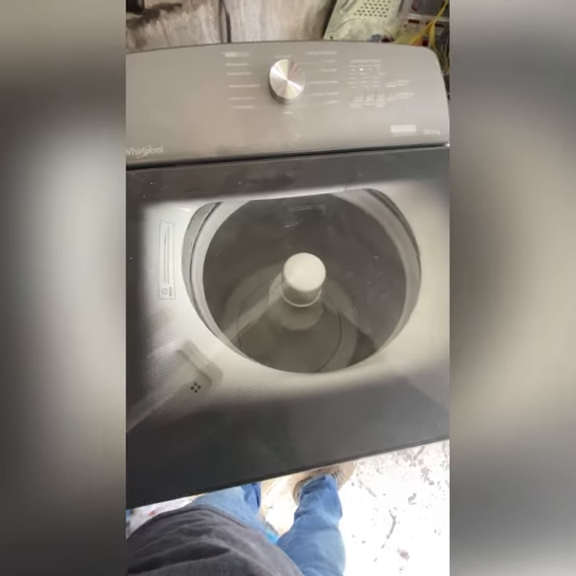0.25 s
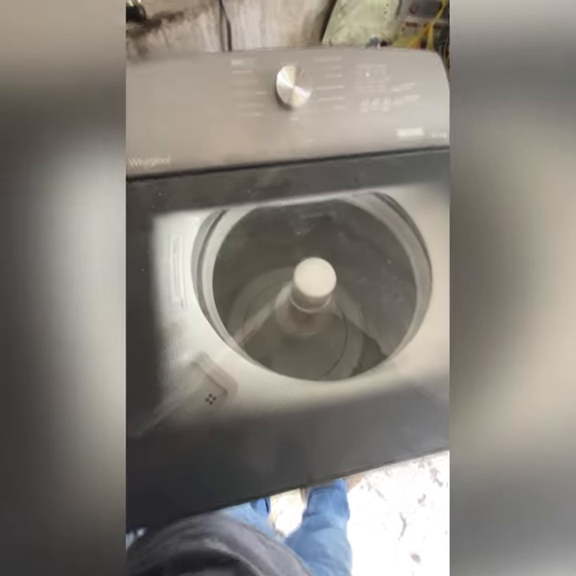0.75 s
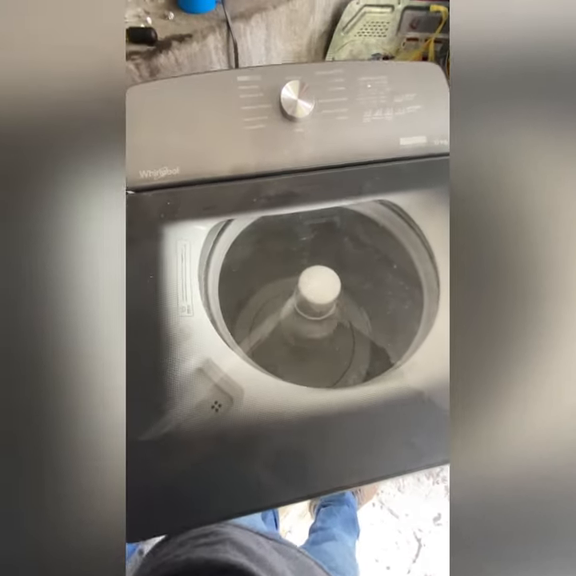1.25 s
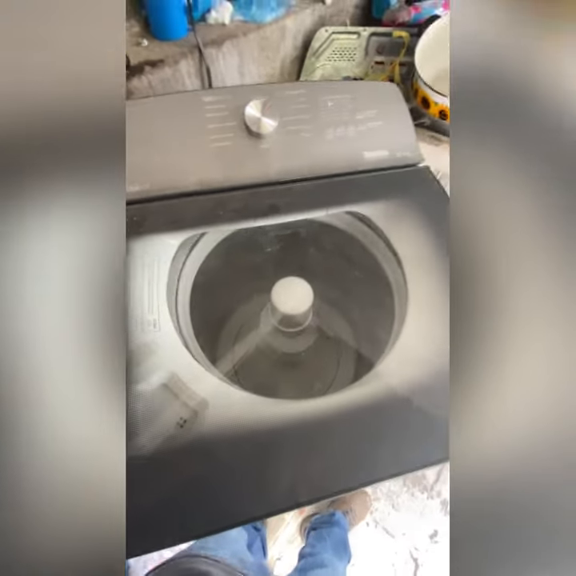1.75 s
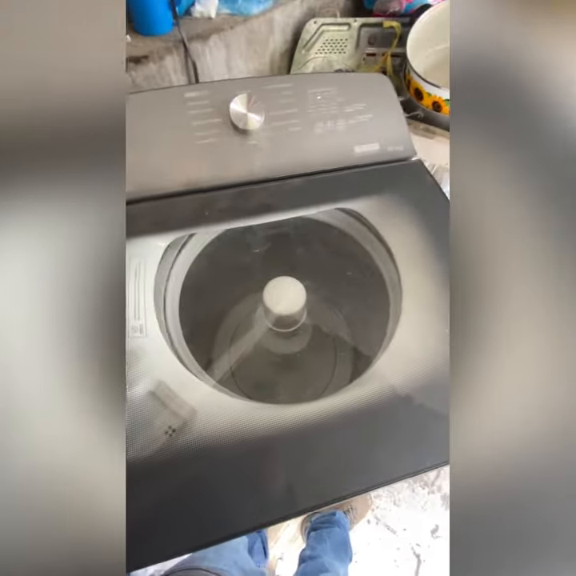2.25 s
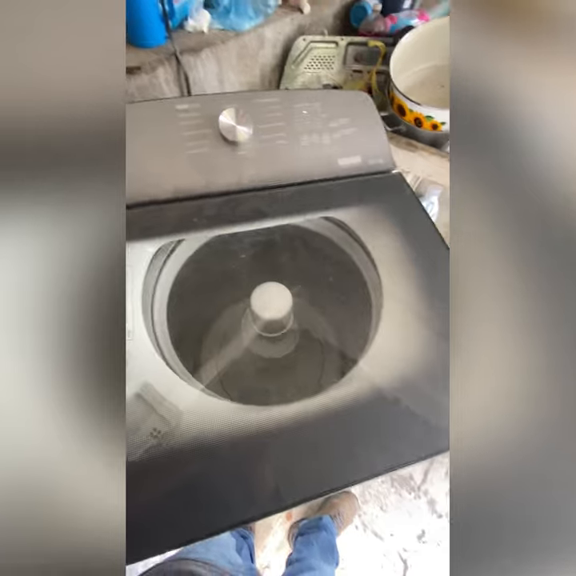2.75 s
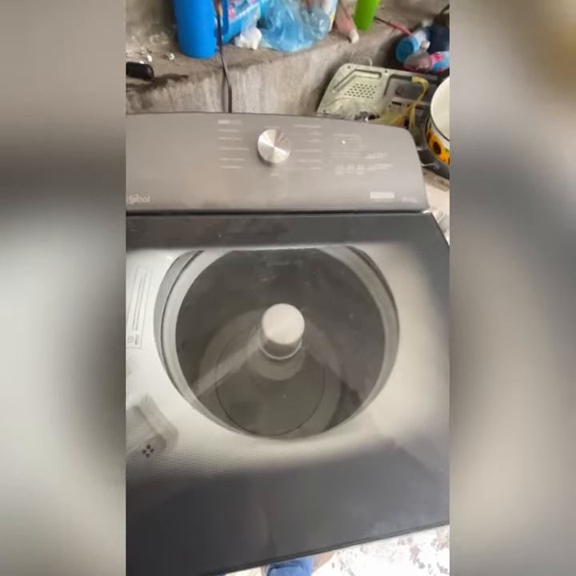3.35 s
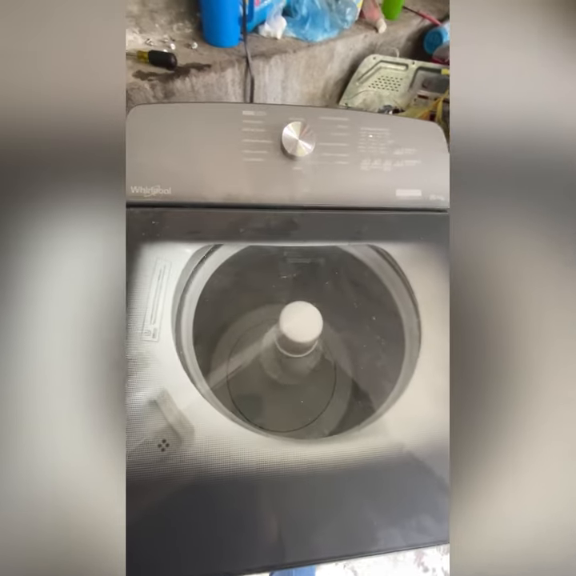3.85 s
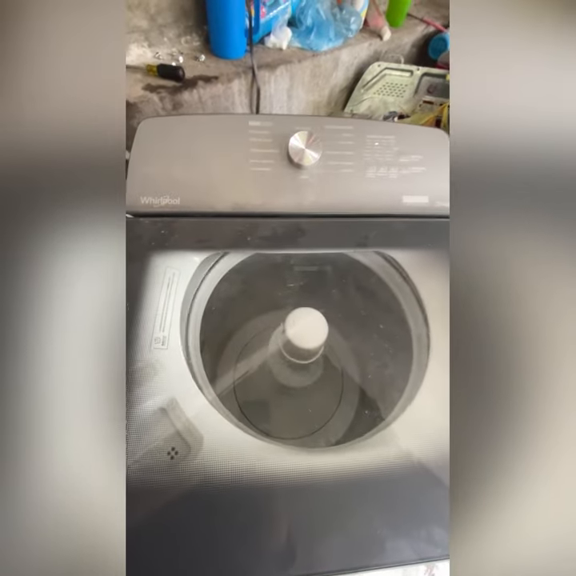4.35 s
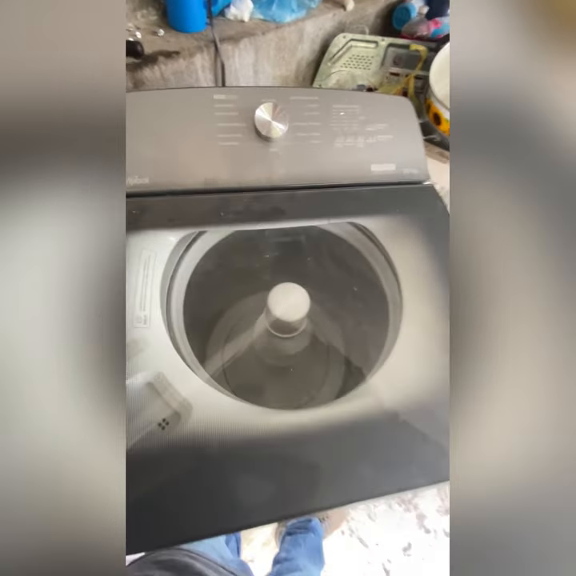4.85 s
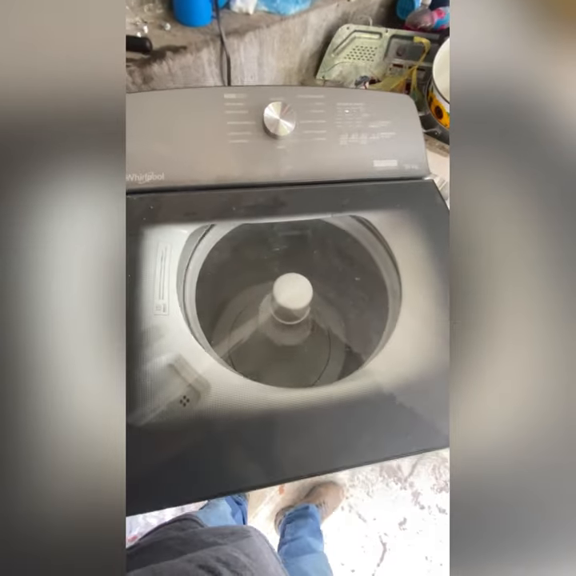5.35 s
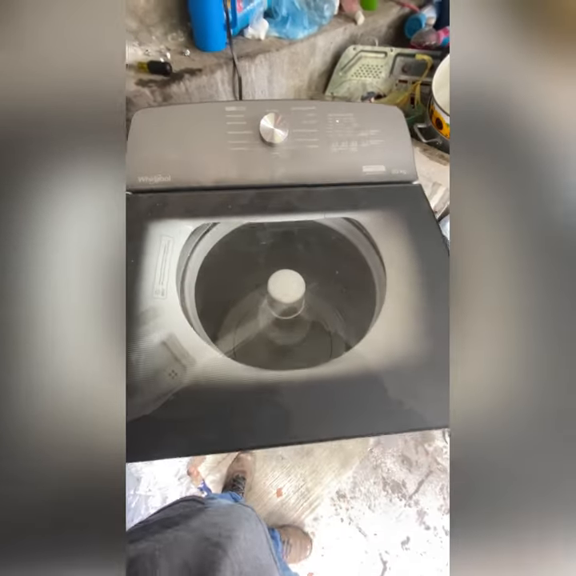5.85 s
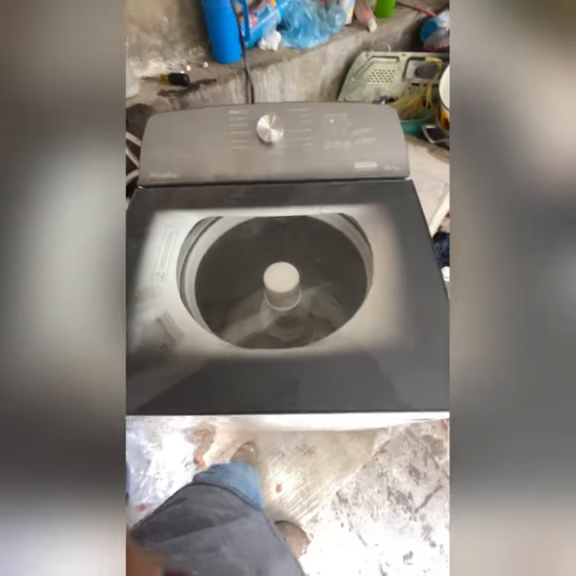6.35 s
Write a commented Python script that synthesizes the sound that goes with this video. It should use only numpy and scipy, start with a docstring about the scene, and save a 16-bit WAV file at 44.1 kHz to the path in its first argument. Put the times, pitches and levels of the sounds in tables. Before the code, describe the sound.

Washer tub rumbles and whines, the motor clicks off, and the drum slowly winds down with hollow pulsing as soles scrape a rough floor.

```python
"""Washing machine coasting down, with shoe scuffs

A top-loader spins on a concrete floor: steady motor lines cut out with a clack, then the tub's rotation orders
slide down through panel resonances. Gliding tones make a deep boom and drone; shaped noise makes rumble and wash.
Hollow throbs recur once a turn; soft noise puffs, drips and thin squeals come and go. Noise strokes with sole
resonances scuff the gritty floor, once in a long slide."""
import sys
import numpy as np
from scipy import signal
from scipy.fft import rfft, irfft
from scipy.io import wavfile

SR = 44100
rng = np.random.default_rng(int(sys.argv[2]) if len(sys.argv) > 2 else 0)


def persist_wave(psi):
    """Save psi, clipped to +-1, as 16-bit WAV."""
    counts = np.round(np.clip(psi, -1, 1) * 32767).astype(np.int16)
    wavfile.write(sys.argv[1], SR, np.atleast_2d(counts).T)


N = 290619
TIME = np.arange(N) / SR
FREQS = np.maximum(np.arange(N // 2 + 1) * SR / N, 1)

SPIN_TURNS_PER_S = 12.66
MOTOR_OFF_S = 0.914
RUB_HZ = 280

# likeness of the two microphone ports: freq_hz, likeness (0 to 1)
LIKENESS = [(60, 0.99), (170, 0.97), (270, 0.83), (430, 0.4), (680, 0.061), (1150, 0.65), (1600, 0.37),
            (2100, 0.53), (3000, 0.31), (5500, 0.85), (9000, 0.9), (10000, 0.89)]
# phase by which the left port leads: freq_hz, lead_rad
LEAD = [(60, 0), (300, -.15), (560, 0), (750, 2.2), (1100, 1.8), (1750, .2), (2300, 2.2), (2900, 2.4),
        (4000, 1.0), (4600, 1.8), (5400, .5), (7500, 3.1), (9800, 6.2), (11000, 6.3), (12500, 8.8)]


def from_db(db):
    """Decibels to gain."""
    return np.exp(np.asarray(db) * (np.log(10) / 20))


def rms_one(x):
    """Scale to unit power."""
    return x / np.sqrt(np.mean(x ** 2) + 1e-20)


def at_hz(points, hz):
    """Read a spectrum on a log-frequency axis."""
    freq_hz, value = np.transpose(points)
    return np.interp(np.log(hz), np.log(freq_hz), value)


def drift(rate_hz):
    """Slow random wander of rms 1: two-pole low-passed noise, computed every 100 samples."""
    r = np.exp(-200 * np.pi * rate_hz / SR)
    white = rng.standard_normal(N // 100 + 1002)
    slow = signal.lfilter([1], [1, -2 * r, r * r], white)[1000:]  # drop the filter's start-up
    return np.interp(np.arange(N) / 100, np.arange(len(slow)), rms_one(slow))


def noise(spectrum, grain_db=0):
    """Coloured noise of rms 1 at the two ports; grain_db roughens its level."""
    white = rng.standard_normal((2, N)) * from_db(grain_db * drift(150))
    mid, side = rfft(white) * from_db(at_hz(spectrum, FREQS))
    alike, lead_rad = np.clip(at_hz(LIKENESS, FREQS), 0, 1), at_hz(LEAD, FREQS)
    sign = np.array([[1], [-1]])
    ports = np.sqrt(1 + alike) * mid + sign * np.sqrt(1 - alike) * side
    ports = ports * np.exp(.5j * sign * lead_rad)
    return rms_one(irfft(ports, N))


def tone(cycles, hz, scatter_cycles=1):
    """Sine of rms 1 on a running cycle count, with the port lead near hz and a random start phase."""
    lead_rad = at_hz(LEAD, hz) * at_hz(LIKENESS, hz) * np.array([[.5], [-.5]])
    angle_rad = 2 * np.pi * ((cycles + scatter_cycles * rng.random()) % 1) + lead_rad
    return np.sqrt(2) * np.sin(angle_rad.astype(np.float32))


def burst(start_s, rise_s, t60_s, hold_s=0):
    """Envelope: linear rise, hold, exponential decay, ended 1.5 t60 after the hold."""
    out = np.zeros(N)
    end_s = start_s + rise_s + hold_s + 1.5 * t60_s
    span = slice(max(round(start_s * SR), 0), round(end_s * SR))
    age_s = TIME[span] - start_s
    decay_db = -60 * np.maximum(age_s - rise_s - hold_s, 0) / t60_s
    out[span] = np.clip(age_s / rise_s, 0, 1) * from_db(decay_db)
    return out


def swell(crest_s, length_s):
    """Smooth arch of height 1."""
    return np.cos(np.pi * np.clip((TIME - crest_s) / length_s, -.5, .5))


def band(x, hz, q):
    """One resonance, gain 1 at its centre."""
    return signal.lfilter(*signal.iirpeak(hz, q, fs=SR), x)


def near_walls(x, echo_db=-5, t60_s=.05):
    """Floor, wall and cabinet return a short, decaying cluster of bright echoes."""
    age_s = np.arange(SR // 12) / SR
    echoes = rng.standard_normal((2, len(age_s))) * from_db(-60 * age_s / t60_s) * (age_s > .002)
    highpass = signal.butter(2, 900, "high", fs=SR, output="sos")
    echoes = signal.sosfilt(highpass, echoes)
    echoes = echoes / np.linalg.norm(echoes, axis=1, keepdims=True)
    return x + from_db(echo_db) * signal.fftconvolve(x, echoes, axes=1)[:, :N]


def tub_speed():
    """Turns per second: steady until the motor cuts out, then friction slows it exponentially."""
    coast_s = 26.0  # time constant
    return SPIN_TURNS_PER_S * np.exp(-np.maximum(TIME - MOTOR_OFF_S, 0) / coast_s)


def power():
    """1 while the motor drives, fading linearly to 0 from the cut."""
    fade_s = 0.062
    return np.clip((MOTOR_OFF_S - TIME) / fade_s + 1, 0, 1)


def running_level(law, speed):
    """Level in dB that grows with the log of the speed and with the motor's drive."""
    full_db, drive_db, exponent = law
    return full_db + drive_db * power() + exponent * 20 * np.log10(speed / SPIN_TURNS_PER_S)


def tub(speed, waver_db=6.0, bearing_waver_db=3.5, scatter_cycles=0.64):
    """Orders slide with the speed and swell across panel resonances; partly aligned upper ones throb each turn."""
    # strong low orders of the unbalanced tub, before waver and lift: order, level_db (rms)
    orders = [(3, -57), (5, -46), (6, -64.5), (7, -43.5), (8, -51), (9, -52), (10, -54), (11, -53),
              (12, -54.5), (13, -61), (16, -60)]
    # upper orders from bearing and belt, each before the offset below: freq_hz, level_db (rms)
    bearing = [(170, -64), (230, -60), (290, -58), (400, -65), (480, -74), (560, -65.5), (680, -99)]
    # offset of the upper orders as the tub runs more or less out of true: time_s, offset_db
    upper_offset = [(0, 4.5), (1.2, -0.5), (1.8, -1), (2.9, -4), (3.9, -3.5), (4.9, 1), (5.8, -0.5),
                    (6.6, -3)]
    # cabinet panels that lift a passing order: centre_hz, width_hz, lift_db
    panels = [(60.22, 2.5, 14.5), (63.2, 3.4, 10), (82.7, 7.4, 4), (131.2, 7.4, 5)]
    turns, out = np.cumsum(speed) / SR, np.zeros((2, N))
    shake_turns = .004 * drift(6)  # the load rocks the tub, smearing the high orders
    strong = {round(order): db for order, db in orders}
    upper_db = np.interp(TIME, *np.transpose(upper_offset))
    for order in range(3, 62):
        hz = order * speed
        if order in strong:
            level_db = strong[order] + waver_db * min(order / 20, 1) * drift(5)
            scatter = 1
        elif order > 13:
            level_db = at_hz(bearing, hz) + upper_db + bearing_waver_db * drift(5)
            scatter = scatter_cycles
        else:
            continue
        lift_db = sum(db / (1 + ((hz - centre_hz) / (width_hz / 2)) ** 2)
                      for centre_hz, width_hz, db in panels)
        cycles = order * (turns + shake_turns)
        out += from_db(level_db + lift_db) * tone(cycles, hz.mean(), scatter)
    return out


def throb(speed, at_turn, hz, width_s, wander_cycles=.12):
    """Hollow hum swelling at one place in every turn, earlier in the turn under power."""
    slip_turns = .38
    turns = np.cumsum(speed) / SR - at_turn + slip_turns * power()
    from_contact_s = ((turns + .5) % 1 - .5) / speed
    arch = np.exp(-.5 * (from_contact_s / width_s) ** 2)
    arch = arch * np.minimum(8 * np.cos(np.pi * turns) ** 2, 1)  # closes between contacts
    cycles = hz * from_contact_s + wander_cycles * hz / RUB_HZ * drift(10.1)
    return arch * tone(cycles, hz)


def panel_rub(speed, uneven_db=1.5, brush_uneven_db=2.5):
    """Once a turn the tub rubs one side panel and brushes others, each with its own pitch."""
    # how hard it rubs: time_s, crest_db (rms, before unevenness)
    rub_level = [(0, -40), (.85, -46.5), (1.05, -37), (1.3, -46.5), (1.78, -39), (2.05, -40), (2.5, -43.5),
                 (2.75, -34.5), (3.2, -38.5), (3.5, -42.5), (4.15, -55), (4.4, -43), (4.95, -40.5),
                 (5.55, -42.5), (5.8, -37.5), (6.2, -41), (6.59, -47)]
    # brushes at full speed, motor off: place_turns, pitch_hz, half_length_s, crest_db (rms), speed_exponent
    brushes = [(.72, 415, .015, -44, 7), (.92, 366, .022, -47.5, 2.5), (.14, 545, .019, -53, 1),
               (.92, 705, .018, -58, 4)]
    level_db = np.interp(TIME, *np.transpose(rub_level)) + uneven_db * drift(6.2)
    out = from_db(level_db) * throb(speed, at_turn=.55, hz=RUB_HZ, width_s=.015)
    for at_turn, hz, width_s, db, exponent in brushes:
        level_db = running_level((db, 0, exponent), speed) + brush_uneven_db * drift(4)
        drive_gain = 1 - .6 * power()  # brushes are weaker under power
        out = out + from_db(level_db) * drive_gain * throb(speed, at_turn, hz, width_s)
    return out


def booms(waver_hz=0.39):
    """Deep gliding tones swell and fade, wavering a little in pitch."""
    # deep wandering boom: time_s, pitch_hz, level_db (rms)
    boom_curve = [(0, 50.4, -45), (.25, 51.1, -35), (.55, 51.64, -28), (1.0, 51.4, -35),
                  (1.35, 53.86, -35.5), (1.65, 61, -32), (1.9, 55.6, -63), (3.05, 58.8, -58),
                  (3.28, 57.3, -38), (3.45, 55, -45), (3.57, 53.26, -34), (3.95, 52.73, -34.5),
                  (4.12, 58.7, -31.5), (4.3, 64.1, -34), (4.42, 53.4, -34), (4.55, 51.8, -41),
                  (4.7, 54.7, -59), (4.82, 54.75, -36), (4.98, 52.6, -39), (5.12, 59, -64),
                  (5.25, 66.6, -40.5), (5.43, 63, -31.5), (5.75, 58.7, -39.5), (5.92, 51.64, -37.5),
                  (6.24, 51.5, -32.5), (6.38, 51, -39), (6.55, 52.7, -37.5)]
    # higher drone that grows as the tub slows: time_s, pitch_hz, level_db (rms)
    drone_curve = [(4.5, 84.8, -68), (5.2, 85.5, -52.5), (5.95, 91.7, -53), (6.25, 94.5, -41.5),
                   (6.59, 92, -37.5)]
    out = 0
    for curve in (boom_curve, drone_curve):
        time_s, pitch_hz, level_db = np.transpose(curve)
        hz = np.interp(TIME, time_s, pitch_hz) + waver_hz * drift(2.66)
        gain = from_db(np.interp(TIME, time_s, level_db))
        out = out + gain * tone(np.cumsum(hz) / SR, pitch_hz.mean())
    return out


def motor(waver_db=1.1, wobble_cycles=.022):
    """Mains hum and rotor whine last until the cut; higher lines are less steady and sag just before it."""
    # motor under power, before waver: freq_hz, level_db (rms)
    motor_lines = [(120, -44), (240.2, -41), (360.3, -42.8), (423.5, -51), (541, -56), (723.4, -49.3),
                   (843.5, -66), (1083, -66), (1706, -72)]
    sag_s, sag_db = 0.11, 12
    out, sag = 0, np.clip(1 - (MOTOR_OFF_S - TIME) / sag_s, 0, 1)
    for hz, db in motor_lines:
        unrest = hz / motor_lines[1][0]
        wobble = wobble_cycles * unrest * drift(16)
        level_db = db + min(unrest, 2) * waver_db * drift(24)
        level_db = level_db - sag_db * sag * (unrest > 2)
        out = out + from_db(level_db) * tone(hz * TIME + wobble, hz)
    return power() * out


def gurgle(x, depth_db=2.6, rate_hz=7, q=11):
    """Sloshing water makes narrow hollows in the wash bloom and close independently."""
    # hollows opened by the water: centre_hz
    hollows_hz = (1090, 1380, 1604, 2000, 2410)
    return x + sum(band(x, hz, q) * (from_db(depth_db * drift(rate_hz)) - 1) for hz in hollows_hz)


def running(speed, swing_db=0.2, flutter_db=1.3, lump_db=2.6):
    """Lumpy cabinet rumble and a wash of air and water, both noise, swing slightly once a turn."""
    # rumble colour: freq_hz, relative_db (per Hz)
    rumble_spectrum = [(25, -8), (40, -8), (55, 20), (80, 19.5), (120, 12), (160, 6), (190, -1),
                       (235, 11.5), (280, 7.5), (330, 10.5), (400, 7), (480, 4.5), (570, 5.5), (650, 0),
                       (720, -3), (1100, -40)]
    # wash colour: freq_hz, relative_db (per Hz)
    wash_spectrum = [(400, 6), (800, 16.5), (1100, 9.5), (1600, 5), (2500, 4), (3300, -2.5), (4500, -8),
                     (5800, -10), (7300, -14), (10000, -26.5), (11300, -39), (12300, -51)]
    # narrow resonances added to the wash: freq_hz, q, gain_db
    wash_resonances = [(1566, 52, -10), (2430, 59, -7), (5640, 22, -19)]
    # rumble level: full_speed_db, drive_db, speed_exponent
    rumble_law = (-39, 3.1, 3.04)
    # wash level: full_speed_db, drive_db, speed_exponent
    wash_law = (-49.5, 2.34, 2.35)
    swing = swing_db * np.sin(2 * np.pi * np.cumsum(speed) / SR)

    rumble = noise(rumble_spectrum)
    for hz in (240, 390, 560):  # each cabinet hollow swells on its own
        rumble = rumble + band(rumble, hz, 6.9) * (from_db(lump_db * drift(9.4)) - 1)

    wash = noise(wash_spectrum, grain_db=0.5)
    wash = rms_one(wash + sum(from_db(db) * band(wash, hz, q) for hz, q, db in wash_resonances))
    wash = rms_one(gurgle(wash))
    # the top of the hiss comes and goes
    wash = wash + band(wash, 9500, 2.5) * (from_db(2.2 * drift(4)) - 1)

    rumble_db = running_level(rumble_law, speed) + swing + flutter_db * drift(14.5)
    wash_db = running_level(wash_law, speed) + .5 * swing + .5 * drift(10)
    return from_db(rumble_db) * rms_one(rumble) + from_db(wash_db) * wash


def shoes(sole_db=5, sole_q=8):
    """Soles scrape the concrete, each stroke with its own resonance, and grind fine grit over it."""
    # strokes, before resonance and echoes: start_s, rise_s, scrape_db, grit_db, sole_hz
    scuffs = [(0.0, 0.0081, -51, -57, 2587), (.11, 0.014, -57, -61, 2560), (.255, 0.008, -61, -60, 5370),
              (.322, 0.0042, -53, -52.5, 5100), (.635, 0.03, -60, -61, 2190), (.77, 0.01, -73, -73, 2480),
              (.994, 0.0089, -59, -60.5, 5500), (1.184, 0.0039, -69, -57, 5400),
              (1.55, 0.087, -59, -62.5, 5370), (1.799, 0.011, -55, -60, 2406),
              (2.001, 0.0086, -54, -59, 4800), (2.267, 0.005, -51.5, -50.5, 5500),
              (2.69, .01, -61, -69, 5550), (3.26, 0.071, -58.5, -60, 5543),
              (3.68, 0.0086, -63, -63.5, 1511), (4.488, 0.005, -57, -55.5, 5800),
              (4.722, 0.019, -60, -61, 6200), (4.765, 0.016, -59, -67, 5640),
              (5.524, 0.009, -56.5, -60, 5485), (5.555, 0.0096, -52.5, -63.5, 4400),
              (5.81, 0.042, -62.5, -68, 5255), (6.22, 0.027, -63, -71, 5340)]
    # scrape colour: freq_hz, relative_db (per Hz)
    scrape_spectrum = [(700, 15), (1400, 13), (2600, 16.5), (3600, 11.5), (5000, 10), (6000, 5.5),
                       (7300, -12), (10000, -45)]
    # grit colour: freq_hz, relative_db (per Hz)
    grit_spectrum = [(4000, 10.5), (7000, 14.5), (9000, 8.5), (11000, 6), (12200, 1), (14000, -36)]
    base_t60_s, reference_db, drag_s_per_db = 0.24, -51, 0.0039
    scrape, grit = noise(scrape_spectrum, grain_db=1.8), noise(grit_spectrum, grain_db=1.8)
    out = slide()
    for start_s, rise_s, scrape_db, grit_db, hz in scuffs:
        # the lighter the stroke, the longer it drags
        t60_s = max(base_t60_s + drag_s_per_db * (reference_db - scrape_db), rise_s)
        sole = scrape + from_db(sole_db) * band(scrape, hz, sole_q)
        stroke = from_db(scrape_db) * sole + from_db(grit_db) * grit
        out = out + burst(start_s, rise_s, t60_s) * stroke
    return near_walls(out)


def slide(flare_db=4, grain_db=1.2):
    """One long, rough noise stroke of a sole, whose resonances flare and fade as it grips."""
    # slide colour: freq_hz, relative_db (per Hz)
    slide_spectrum = [(500, -23), (1000, -2), (1500, -3.5), (2300, 4), (2800, 4.5), (4000, 1), (4700, 3),
                      (5200, 5.5), (5650, 5), (6500, 2.5), (7700, -3.5), (10300, -7.5), (12200, -13.5),
                      (14000, -40)]
    # sole resonances, before flaring: freq_hz, q, gain_db
    sole_rings = [(2700, 20, -14), (3250, 40, -16), (4730, 70, -7), (4925, 90, -2), (5650, 18, -12),
                  (6350, 60, -12)]
    hiss = noise(slide_spectrum, grain_db)
    rings = sum(from_db(db + flare_db * drift(9)) * band(hiss, hz, q) for hz, q, db in sole_rings)
    envelope = burst(start_s=2.293, rise_s=0.043, t60_s=0.72, hold_s=0.066)
    return from_db(-39) * envelope * rms_one(hiss + rings)


def drips(level_db=-63, spread_db=3, t60_s=.05, bend_per_s=1.0, count=24):
    """Small drops fall in the tub at random times, each a short decaying ping of rising pitch."""
    out, age_s = np.zeros((2, N + SR)), np.arange(SR // 10) / SR
    for when, pitch, size, angle in rng.random((count, 4)):
        hz, start = 1400 + 1400 * pitch, int(when * N)
        cycles = hz * age_s * (1 + bend_per_s * age_s)
        ping = np.sin(2 * np.pi * cycles + np.array([[0], [2 * np.pi * angle]]))
        ping_db = level_db + spread_db * (2 * size - 1) - 60 * age_s / t60_s
        out[:, start:start + len(age_s)] += ping * from_db(ping_db)
    return out[:, :N]


def crack(t60_s=.002, q=1.2):
    """Each grain of grit breaks underfoot with a tiny, dry snap: a click through a broad resonance."""
    # snaps, before echoes: time_s, peak_db, freq_hz
    cracks = [(.3093, -34, 4500), (4.7655, -43, 1900)]
    out = 0
    for start_s, db, hz in cracks:
        spark = burst(start_s, 1 / SR, t60_s)
        spark = spark ** 4 + .3 * spark * rng.standard_normal(N)
        snap = band(band(spark, hz, q), hz, q)
        out = out + from_db(db) * snap / np.abs(snap).max()
    return near_walls(np.tile(out, (2, 1)), echo_db=-9)


def squeal(wobble_hz=30, flicker_db=3.0):
    """Faint whistles swell and fade, roughened by fast pitch wobble and flickering level."""
    # squeals, before flicker: crest_s, length_s, pitch_hz, crest_db (rms)
    squeals = [(0.732, 0.2, 2075, -64), (0.79, 0.025, 2530, -54), (2.033, 0.05, 2440, -56.5),
               (2.284, 0.031, 5650, -54), (4.17, 1, 2490, -76), (5.077, 0.43, 6690, -70.5),
               (5.57, 0.038, 4630, -56), (5.594, 0.049, 5120, -64)]
    wobble = wobble_hz * np.cumsum(drift(150)) / SR
    out = 0
    for crest_s, length_s, hz, db in squeals:
        gain = from_db(db + flicker_db * drift(21)) * swell(crest_s, length_s)
        out = out + gain * tone(hz * TIME + wobble, hz)
    return out


def clack(ring_db=-5.5, rattle_db=-2.5, rattle_t60_s=0.14):
    """The drive lets go: quick contacts ring the housing's modes and leave a short noise rattle."""
    # contacts: time_s, relative_db
    contacts = [(.8905, -32), (.897, -32), (.904, -29.5), (0.916, -35.5), (0.932, -40)]
    # housing modes: freq_hz, relative_db, t60_s
    housing = [(252, -11, 0.08), (330, -5, 0.05), (423, 4.5, 0.12), (528.6, -2, 0.3), (858, -12, 0.11),
               (1070, -14, 0.06), (1327, -8.5, 0.039), (1522, -8, 0.13), (1718, -14, 0.15),
               (2272, -23, 0.13), (2620, -26, 0.12), (2800, -22, 0.06), (3410, -24, 0.08), (3750, -30, 0.1),
               (3870, -29, 0.06)]
    # rattle colour: freq_hz, relative_db (per Hz)
    rattle_spectrum = [(200, -9), (400, 4.5), (650, 3), (1000, -10), (1400, -10), (1800, -17), (2150, -21),
                       (3000, -20.5), (4000, -29.5), (6000, -30), (8000, -57)]
    rattle_power = sum((from_db(db) * burst(s, 0.00052, rattle_t60_s)) ** 2 for s, db in contacts)
    out = from_db(rattle_db) * noise(rattle_spectrum) * np.sqrt(rattle_power)
    loudest_db = max(db for hz, db, t60_s in housing)
    for hz, mode_db, t60_s in housing:
        clicks = np.zeros(N)
        for s, db in contacts:
            click_db = db + mode_db - loudest_db + ring_db + rng.normal(0, 1.3)
            clicks[round(s * SR)] = rng.choice([-1, 1]) * from_db(click_db)
        # two-pole resonator; the tiny offset avoids denormals
        r, w = from_db(-60 / (t60_s * SR)), 2 * np.pi * hz / SR
        out = out + signal.lfilter([0, np.sin(w)], [1, -2 * r * np.cos(w), r * r], clicks + 1e-18)
    return near_walls(out)


def soft_puffs(t60_s=.13, q=2.2):
    """Short, soft puffs of resonant noise, low and mid pitched; the highest is a foot's knock."""
    # puffs: start_s, rise_s, level_db, freq_hz
    puffs = [(1.776, .004, -41, 295), (2.702, .004, -44, 280), (2.757, .003, -48, 570),
             (4.489, 0.011, -45.5, 1540), (5.027, .003, -48, 608), (6.112, .004, -42, 296)]
    body = noise([(200, 0), (8000, -12)])
    out = 0
    for start_s, rise_s, db, hz in puffs:
        hollow = rms_one(band(band(body, hz, q), hz, q))
        out = out + from_db(db) * burst(start_s, rise_s, t60_s) * hollow
    return out


def scene():
    """The machine, the soft puffs and the feet in front of it."""
    speed = tub_speed()
    machine = tub(speed) + panel_rub(speed) + booms() + motor() + running(speed)
    machine = machine + drips() + squeal() + clack()
    return machine + soft_puffs() + shoes() + crack()


def record(dry):
    """Cut the top steeply with an elliptic low-pass."""
    cutoff_hz = 12150
    return signal.sosfilt(signal.ellip(10, .3, 80, cutoff_hz, fs=SR, output="sos"), dry)


dry = scene()
out = record(dry)
persist_wave(out)
```